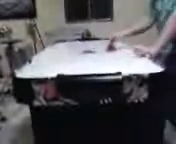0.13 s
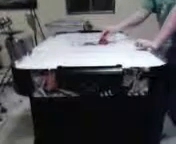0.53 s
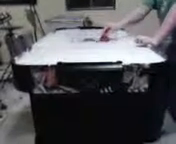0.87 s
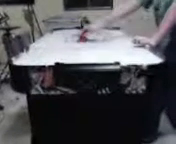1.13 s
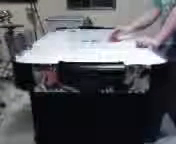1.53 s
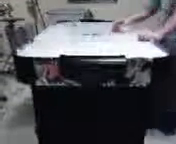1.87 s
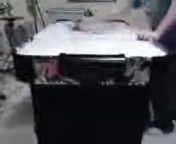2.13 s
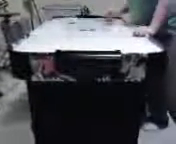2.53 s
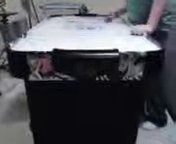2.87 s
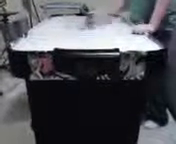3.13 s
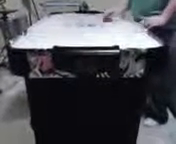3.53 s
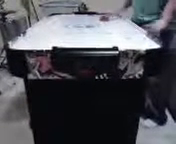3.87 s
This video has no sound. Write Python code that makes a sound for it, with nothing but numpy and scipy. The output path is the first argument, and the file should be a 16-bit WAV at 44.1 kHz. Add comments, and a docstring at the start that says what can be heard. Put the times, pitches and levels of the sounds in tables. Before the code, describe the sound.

Sharp, spaced knocks of an air hockey puck and mallet sound over a steady blower hiss indoors. Near the end the puck slams into the goal, briefly overloading the narrow-sounding microphone, and rattles with a short ring.

```python
"""A bare basement room with an air hockey table, heard through a narrow-band microphone.
The blower hums and hisses; the gliding puck whistles on its air cushion. Mallet hits and rail bounces
excite damped modes and a dead clack, with short room echoes. The puck finally slams into the goal,
overloads the recorder and rattles in the return chute, where a tube rings on."""
import sys
import numpy as np
from scipy import signal
from scipy.fft import rfft, irfft
from scipy.io import wavfile
from scipy.ndimage import uniform_filter1d

SR = 44100
rng = np.random.default_rng(int(sys.argv[2]) if len(sys.argv) > 2 else 0)


def pcm_store(signal):
    """Save signal as 16-bit PCM."""
    levels = np.round(np.clip(np.atleast_2d(signal), -1, 1) * 32767)
    wavfile.write(sys.argv[1], SR, levels.astype(np.int16).T)


N = 176400


def amp(db):
    return 10 ** (np.asarray(db) / 20)


def unit_rms(x):
    return x / np.sqrt(np.mean(x ** 2) + 1e-20)


def in_time(rows):
    """Rows of (time [s], values...) to per-sample curves; end values held."""
    times_s, *columns = np.transpose(rows)
    return [np.interp(np.arange(N) / SR, times_s, column) for column in columns]


def at_hz(rows, hz):
    """Interpolate (frequency [Hz], value) rows over log frequency."""
    knots_hz, values = np.transpose(rows)
    return np.interp(np.log(hz), np.log(knots_hz), values)


def narrow_noise(centre_hz, width_hz):
    """Noise band on a steady or moving centre; rms 1."""
    lowpass = signal.butter(2, width_hz / 2, fs=SR, output="sos")
    i, q = signal.sosfilt(lowpass, rng.standard_normal((2, N + 8000)))[:, 8000:]
    phase = 2 * np.pi * np.cumsum(centre_hz * np.ones(N)) / SR
    return unit_rms(i * np.cos(phase) + q * np.sin(phase))


def blower():
    """Coloured air noise plus hollow tones of the fan box."""
    # (frequency [Hz], relative level [dB])
    air_spectrum = [(25, -34.5), (60, -28), (140, -17.5), (200, -19), (240, -10), (350, -8.5), (520, -5.5),
                    (690, -4.5), (1000, -3), (1300, -8.5), (1600, -8.5), (2200, -15), (2700, -13),
                    (3300, -13.5), (3700, -25), (4100, -37.5), (4600, -44)]
    # (centre [Hz], width [Hz], level [dB])
    box_tones = [(345, 25, -72.5), (697, 29, -63.5), (915, 26, -66.5), (1040, 4.7, -67), (1160, 35, -69),
                 (1274, 33, -69)]
    bins_hz = np.maximum(np.arange(N // 2 + 1) * SR / N, 1)
    air = irfft(rfft(rng.standard_normal(N)) * amp(at_hz(air_spectrum, bins_hz)), N)
    hum = sum(amp(db) * narrow_noise(hz, width_hz) for hz, width_hz, db in box_tones)
    return amp(-54.5) * unit_rms(air) + hum


def puck_glide():
    """Air whistling under the puck: a wandering band of hiss."""
    # (time [s], centre [Hz], level [dB])
    whistle = [(1.18, 3240, -102), (1.3, 3280, -48.5), (1.55, 3294, -64.5), (1.75, 3310, -58),
               (2.0, 3340, -76), (2.2, 3060, -62.5), (2.3, 3268, -58.5), (2.4, 3272, -71),
               (2.45, 3373, -59.5), (2.65, 3110, -59), (2.85, 3153, -62.5), (3.0, 2906, -62.5),
               (3.1, 3050, -60), (3.2, 3150, -59), (3.35, 3330, -75), (3.5, 3132, -64), (3.85, 3065, -58),
               (4.0, 3260, -60)]
    centre_hz, level_db = in_time(whistle)
    return amp(level_db) * narrow_noise(centre_hz, width_hz=340)


def room_response(share_db, size=32768):
    """Direct impulse plus lumpy echoes that build fast and decay per octave band."""
    # (frequency [Hz], T60 [s])
    reverb_times = [(100, 0.69), (300, 0.13), (700, 0.26), (1400, 0.28), (2700, 0.23), (4000, 0.21)]
    echo_db, lumps_db, build_s = -20, 2.5, 0.001
    t = np.arange(size) / SR
    lumps = uniform_filter1d(rng.standard_normal(size), size=90) * np.sqrt(90)
    echoes = rng.standard_normal(size) * amp(echo_db + share_db + lumps_db * lumps)
    echoes *= 1 - np.exp(-t / build_s)
    response = np.zeros(size)
    edges_hz = 40 * 2.0 ** np.arange(9)
    for low, high in zip(edges_hz, edges_hz[1:]):
        band = signal.sosfilt(signal.butter(1, [low, high], "band", fs=SR, output="sos"), echoes)
        response += band * amp(-60 * t / at_hz(reverb_times, np.sqrt(low * high)))
    response[0] += 1
    return response


def impacts(hits, modes, clack_db):
    """Each hit excites body modes and a dead clack, tilted by where and how hard it lands."""
    pivot_hz, scatter_db, clack_cycles = 1200, 2, 1.7
    crest = 5  # peak squared / highest mean power
    clack = [(hz, clack_db, clack_cycles / hz) for hz in np.geomspace(127, 4520, num=14)]
    hz, mode_db, t60_s = np.transpose([*modes, *clack])[:, :, None]
    octaves = np.log2(hz / pivot_hz)
    # Small bodies radiate little outside this band; a faint thump stays.
    top_cut = signal.butter(8, 3314, fs=SR, output="sos")
    knock_highpass = signal.butter(2, 518, "high", fs=SR, output="sos")
    thump_highpass = signal.butter(1, 71, "high", fs=SR, output="sos")
    t = np.arange(8192) / SR
    out = np.zeros(N + SR)
    for time_s, peak_db, bass_db_oct, treble_db_oct, room_db in hits:
        tilt_db = np.where(octaves > 0, treble_db_oct, -bass_db_oct) * octaves
        gain_db = mode_db + tilt_db + scatter_db * rng.standard_normal(hz.shape)
        partials = amp(gain_db - 60 * t / t60_s) * np.sin(2 * np.pi * hz * t)
        body = signal.sosfilt(top_cut, partials.sum(axis=0))
        knock = signal.sosfilt(knock_highpass, body)
        thump = amp(-23.5) * signal.sosfilt(thump_highpass, body)
        heard = signal.fftconvolve(knock + thump, room_response(room_db))  # new echoes per table spot
        nominal_peak = np.sqrt(crest * uniform_filter1d(heard ** 2, size=400).max())
        start = int(time_s * SR)
        out[start:start + len(heard)] += amp(peak_db) * heard / nominal_peak
    return out[:N]


def rail_bounces():
    """Puck rebounds and sets the rails ringing."""
    # (time [s], peak [dB], bass lift [dB/oct], treble lift [dB/oct], room share [dB])
    hits = [(1.435, -8.5, 1.8, -1, 1.5), (1.582, -21.5, -22, -18, -4), (1.586, -15.5, -39, -22, -13),
            (2.676, -16, 4.5, -7, 0), (2.952, -39.5, -17, -6.5, -11)]
    # (frequency [Hz], relative level [dB], T60 [s])
    modes = [(329.6, -30, .04), (642.6, -16.5, 0.13), (780, -5.5, 0.02), (970, -8, 0.016),
             (1220, 1.5, 0.02), (1325, -5.5, 0.037), (1430, -10, 0.04), (1750, -5, 0.019),
             (2070, -5.5, 0.013), (2428, -14, 0.047), (2680, 2, 0.01), (3071, 0.5, 0.045),
             (3206, 3.5, 0.024), (3494, -34.5, 0.01)]
    return impacts(hits, modes, clack_db=-17.5)


def mallet_strikes():
    """Mallet hits the puck: bright, fast-damped modes."""
    # (time [s], peak [dB], bass lift [dB/oct], treble lift [dB/oct], room share [dB])
    hits = [(1.190, -10.5, 6.4, 2, 5.5), (2.325, -21.5, 3.9, -8.5, -2), (3.227, -11, 1.5, -3.5, -5)]
    # (frequency [Hz], relative level [dB], T60 [s])
    modes = [(560, -34, 0.016), (860, -41, .02), (1357, -23.5, .03), (1563, -7, 0.024), (1774, -11.5, .02),
             (1980, -7.5, .02), (2631, 7.5, 0.038), (2715, 2.5, .028), (3290, -8, 0.037),
             (3900, -16, 0.0067)]
    return impacts(hits, modes, clack_db=-21.5)


def chute_ring():
    """A tube of the goal rings on one rough note while the puck rattles."""
    # (time [s], level [dB])
    envelope = [(3.545, -19.5), (3.555, -12.5), (3.675, -26), (3.773, -53), (3.8, -61)]
    tube_hz, rough_db = 1746, -6.5
    start_s, end_s = envelope[0][0] - .01, envelope[-1][0] + .05
    level_db, = in_time([(start_s, -90), *envelope, (end_s, -90)])
    note = np.sqrt(2) * np.sin(2 * np.pi * tube_hz * np.arange(N) / SR)
    return amp(level_db) * (note + amp(rough_db) * narrow_noise(tube_hz, width_hz=110))


def goal_rattle():
    """Puck slams into the goal and rattles down the return chute."""
    # (time [s], peak [dB], bass lift [dB/oct], treble lift [dB/oct], room share [dB])
    hits = [(3.501, -29.5, 6, -5, -7), (3.517, -2.5, -5, -5, -9.5), (3.522, -4.5, 6.5, 7, -8.5),
            (3.526, -2.5, -7, 2.3, -11.5), (3.531, -6.5, -12.5, -7, -32.5), (3.542, -21.5, 2.3, 3.5, -18.5),
            (3.552, -13.5, -3, -1, -10), (3.566, -5.5, -9.5, -8.5, -17.5), (3.585, -13.5, 4, 5, -10.5),
            (3.602, -12.5, 9, -12, -10.5), (3.628, -12.5, -16.5, -1.5, -4), (3.657, -13, 1, 3.7, -13.5),
            (3.683, -20, -19, 9.5, -12.5), (3.702, -19, -6.5, 1, -15.5), (3.720, -19.5, 8, -7, -11),
            (3.738, -30, -13, 9, -13), (3.763, -24.5, -11, 11.5, -15.5), (3.788, -20, 5, 6.5, -16.5),
            (3.812, -29.5, 8.5, -3, -15.5)]
    # (frequency [Hz], relative level [dB], T60 [s])
    modes = [(335, -30.5, .04), (463, -24.5, 0.0465), (671, -15, 0.39), (827, -25.5, .03),
             (1042, -4, 0.029), (1213, 6.5, 0.013), (1416, 10, 0.011), (1794, 4.5, 0.015), (2196, -5, .012),
             (2650, -2, 0.0099), (2910, -6, .045), (3297, 4.5, 0.0071), (3610, -4, .015)]
    return impacts(hits, modes, clack_db=-21)


def scene():
    knocks = mallet_strikes() + rail_bounces() + goal_rattle()
    return (knocks + chute_ring() + blower() + puck_glide())[None]


def record(dry):
    """Narrow-band microphone, hard overload, faint hiss, steep top cut."""
    mic_stop_hz, clip_level, hiss_db, top_stop_hz = 5140, .72, -101, 16800
    narrow = signal.sosfilt(signal.cheby2(12, 60, mic_stop_hz, fs=SR, output="sos"), dry)
    clipped = np.clip(narrow, -clip_level, clip_level)
    hiss = amp(hiss_db) * rng.standard_normal(dry.shape)
    return signal.sosfilt(signal.cheby2(16, 60, top_stop_hz, fs=SR, output="sos"), clipped + hiss)


dry = scene()
out = record(dry)
pcm_store(out)
```